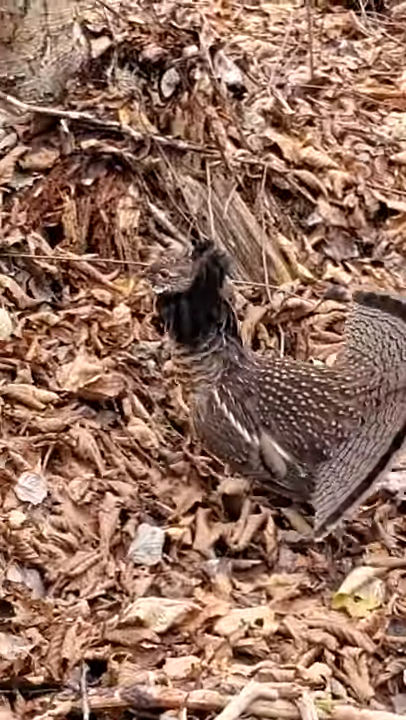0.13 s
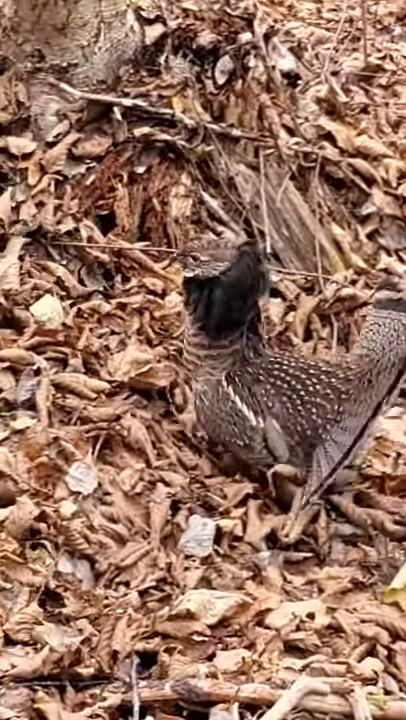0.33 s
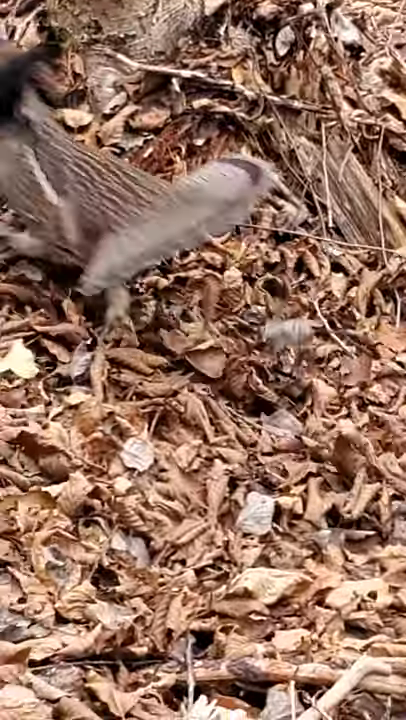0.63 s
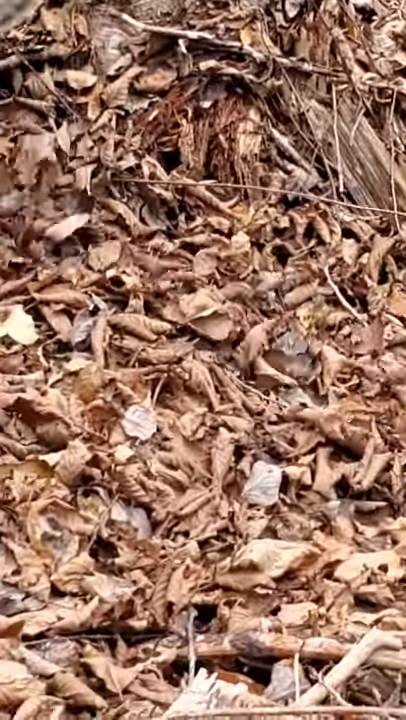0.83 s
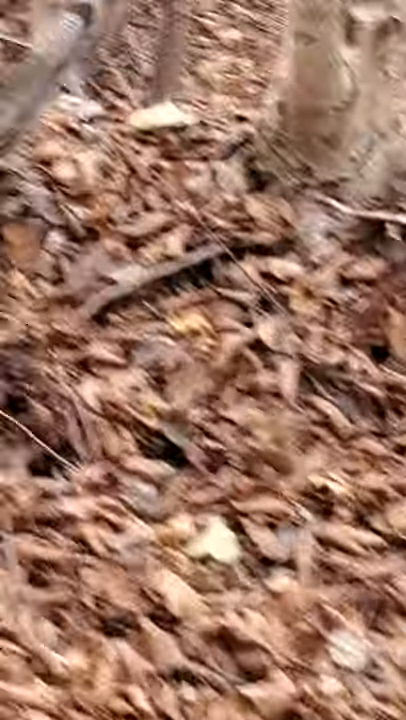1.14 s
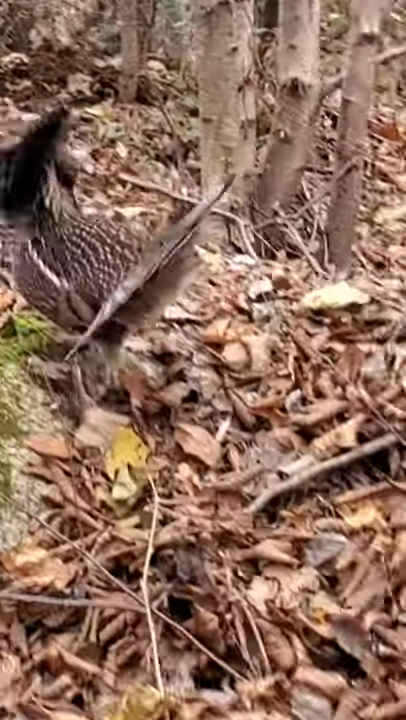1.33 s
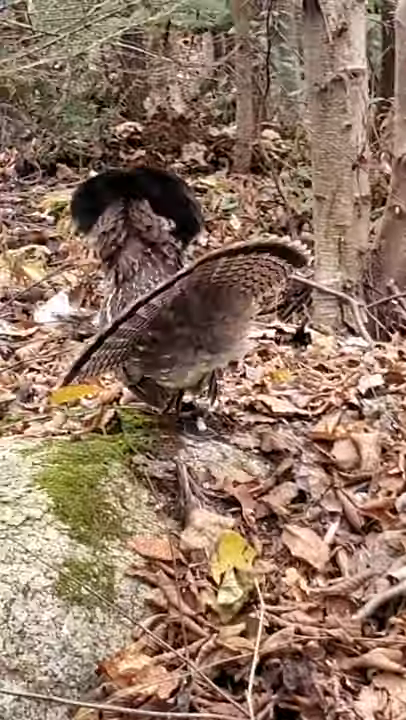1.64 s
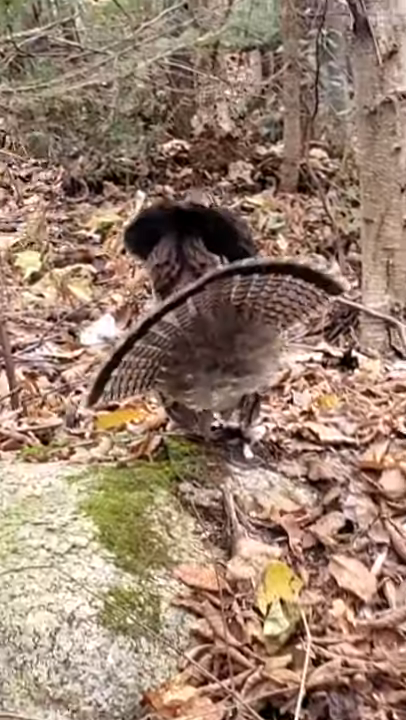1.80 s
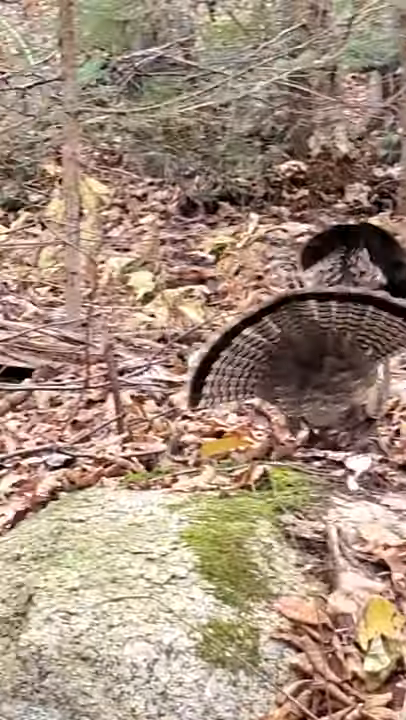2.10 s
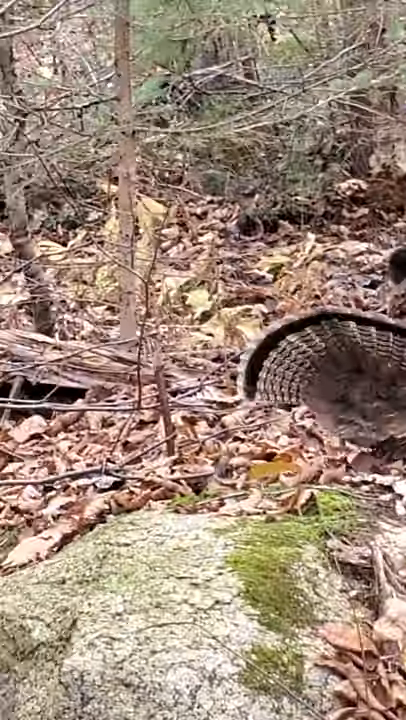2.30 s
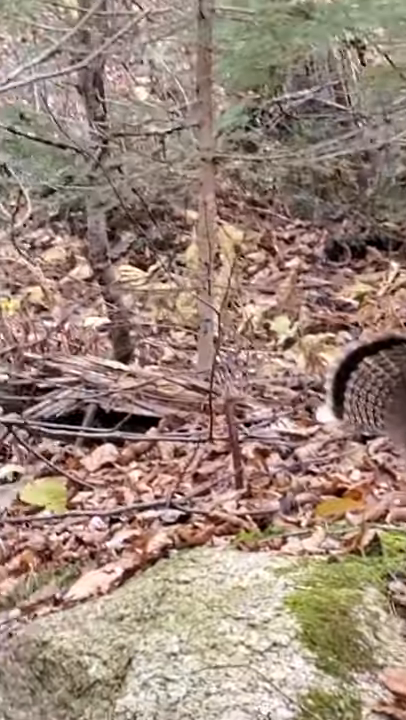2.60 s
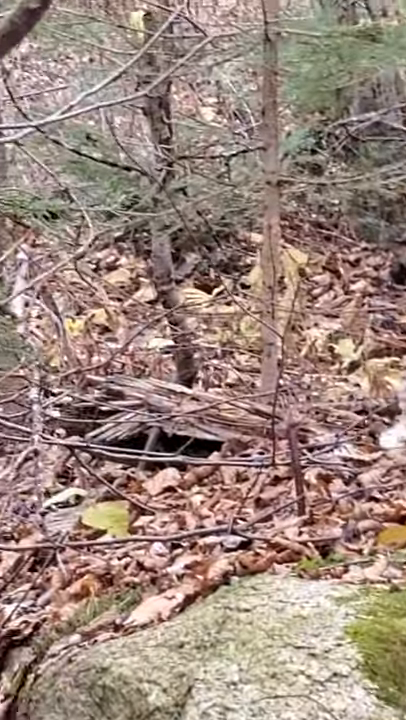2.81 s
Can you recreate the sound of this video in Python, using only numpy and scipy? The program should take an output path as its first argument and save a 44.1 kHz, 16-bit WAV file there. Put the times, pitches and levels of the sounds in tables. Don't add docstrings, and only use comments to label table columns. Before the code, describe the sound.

Dry leaves rustle and tick as a ground bird steps through litter, with light snaps from 0 to 0.5 seconds. A dense, bright burst of crunching and crackling runs from 0.7 to 1.3, then thins to near quiet. A soft low thud at 1.7 precedes a very sharp crack at 1.9. Scattered snaps return, strongest at 2.35-2.6, then fade over faint outdoor air.

```python
import sys
import numpy as np
from scipy import signal
from scipy.fft import rfft, irfft, next_fast_len
from scipy.io import wavfile
from scipy.ndimage import uniform_filter1d, map_coordinates

SR = 44100
rng = np.random.default_rng(int(sys.argv[2]) if len(sys.argv) > 2 else 0)


def wav_out(sig):
    wavfile.write(sys.argv[1], SR, np.round(np.clip(np.atleast_2d(sig).T, -1, 1) * 32767).astype(np.int16))


def nominal_scale(level):
    x = np.asarray(level, float) / 20
    return 10 ** x


N = 130095

# t/s, level/dB, brightness/dB, heap depth/dB, source width/dB
STIR = [(0, -57.5, 1.5, 9, 2), (.2, -56.5, -9.5, 17.5, -3), (.3, -42, -3, 1, -1), (.52, -46.5, -4, -10, 4),
        (.675, -42.5, -3, 1, 3.5), (.76, -31, 4, 1, -2), (.93, -32.5, 1.5, 2, 3),
        (1.07, -43.5, 2, 3.5, 6.5), (1.3, -38.5, 0, -0.5, 2), (1.46, -52.5, 1, 0.5, 5.5),
        (1.82, -57.5, -0.5, 6, 7.5), (1.956, -38.5, 8, 4.5, 4), (2.11, -57.5, -10.5, -6, 13),
        (2.29, -43, 1.5, 1, 5.5), (2.5, -45.5, 2.5, 6, 4), (2.6, -39.5, 3, -1.5, 2),
        (2.78, -51, -1.5, -6.5, 5.5), (2.95, -62, -1.5, -13, 15.5)]
# f/Hz, level/dB
HEAP_COLOUR = [(28, -0.5), (65, -6), (140, -7), (380, -2.5), (900, -6.5), (2100, -16.5)]
# t/s, peak/dB, ring f/Hz, body share/dB, spray after it/dB
SNAPS = [(0.0527, -25, 13300, -37.5, 0), (0.1042, -21.5, 11900, -17, -17),
         (0.2089, -14, 11700, -47, -13), (0.2488, -23, 11800, -27, -1), (0.181, -30, 11000, -3, -22),
         (0.279, -24, 3000, -23, -18), (0.634, -32, 5500, -25, -25),(0.3345, -26, 13200, -27, -3),
         (0.358, -25, 2800, -32, -23), (0.443, -27, 8200, -7, -3.5), (0.6318, -18, 4200, -31, -21),
         (0.7388, -15.5, 12300, -30, -6), (0.7543, -20, 2500, -14, -16), (0.769, -13, 8700, -15, -4),
         (0.8155, -16, 9390, -9, -20), (0.8302, -15, 11900, -2, -7.5), (0.8532, -18, 4240, -17, -5),
         (0.8717, -7.5, 8700, -32, -40.5), (0.9176, -16, 4430, -24, -10.5),
         (0.9604, -10, 9300, -9, -11), (1.0115, -13, 9800, -41, -24), (1.1094, -11, 11000, -0.5, -27),
         (1.1684, -13.5, 14000, -11, -8), (1.2615, -26, 11900, -12, -27), (1.29, -31, 8940, -10, -20),
         (1.4525, -26, 11800, -12, -15), (1.073, -26, 11000, -11, -20), (1.099, -17, 12000, -22, -25),
         (1.302, -14, 11900, -12, -8), (1.5919, -25, 9050, -52, -12),
         (1.8577, -27, 8670, -20, -22), (2.0002, -22, 11500, -23, -25), (2.0282, -24, 11500, -25, -18),
              (2.422, -23, 12000, -30, -20), (1.8758, -16.5, 12100, -5, -23), (1.8916, -15, 9000, -18, -18),
              (1.9056, -24, 11700, -13, -4), (1.9272, -1, 10800, -11, -17.5), (1.9512, -15, 9110, 2.5, -17),
              (2.0546, -33.5, 8800, 0, -6.5), (2.156, -31, 11600, -15, -15), (2.1804, -17, 11100, -10, -14),
              (2.3572, -9, 12800, -40, -25), (2.3765, -24, 2520, -21, -19), (2.393, -22.5, 11500, -12, -3),
              (2.4514, -13.5, 14000, -13, -18), (2.4752, -4.5, 9300, -10, -19),
              (2.489, -9, 14400, -23, -21), (2.5398, -14, 9800, -9, -4), (2.5975, -12, 12200, -37.5, -18),
              (2.6413, -17, 11800, -8, -20), (2.746, -21, 11800, -44, -30), (2.7779, -26, 12400, -19, -13)]
# centre t/s, level/dB, colour f/Hz, length/s
CRUNCHES = [(0.142, -45, 2500, .02), (0.299, -34.5, 4850, 0.034), (.59, -41, 7000, .045),
            (0.625, -33, 5100, .022), (0.736, -33, 9000, .012), (0.771, -26, 4230, 0.044),
            (0.818, -33, 9000, 0.018), (0.831, -27, 9000, .012), (0.854, -23, 4320, .016),
            (.875, -23.5, 9000, .014), (0.931, -37, 4500, 0.029), (0.971, -32, 9000, 0.026),
            (1.183, -33.5, 4970, .025), (1.311, -34, 9000, 0.026), (1.93, -24, 5670, 0.018),
            (2.057, -41.5, 9000, 0.025), (2.178, -38.5, 9000, 0.016), (2.3, -36, 9000, 0.061),
            (2.406, -43, 9000, 0.024), (2.55, -37.5, 4000, 0.018), (2.605, -40, 11100, .03)]
# t/s, peak/dB, pitch f/Hz, length/cycles
THUDS = [(0.203, -30, 89, 1.2), (0.258, -41, 119, 1), (0.837, -36.5, 71.4, 2.2), (1.098, -43, 52.3, 1.1),
         (1.325, -39, 67, 1.3), (1.739, -21, 71.15, 1.13), (2.236, -41, 54, 0.92), (2.545, -33, 78, 2.9),
         (2.608, -35.5, 48.7, 1.84), (0.15, -49, 151, 1.2), (0.69, -53.5, 70, 1.5), (1.265, -45, 70, 1.4),
         (1.67, -45, 70, 1.7), (1.83, -50, 50, 1.5), (2.0, -55, 45.5, 1.5), (2.67, -45, 86, 1.9)]
# t/s, peak/dB, pitch f/Hz, length/cycles
KNOCKS = [(0.136, -30.5, 424, 0.9), (0.296, -38, 553, 3.6), (0.752, -37, 270, 2.9), (0.914, -33, 580, 4.3),
          (1.078, -43, 362, 5.7), (1.382, -28.5, 440, 1.46), (1.623, -55.5, 183, 2.9),
          (1.73, -33, 236, 1.97), (1.851, -55, 233, 3.5), (1.925, -37.5, 190, 3), (2.177, -42, 716, 2.5),
          (2.473, -37.5, 372, 1.9), (2.539, -35, 433, 2.7)]
# f/Hz, likeness/1
LIKENESS = [(60, .9), (300, .96), (1400, .86), (3400, .9), (5600, .84), (7100, .5), (9100, .42),
            (12100, .25), (15100, .1)]
# t/s, treble right over left/dB
FACING = [
    (0, -6.5),
    (.3, 1),
    (.5, -8.5),
    (.66, -7),
    (.8, 3.5),
    (1.2, 0),
    (1.7, 0.5),
    (2.1, -1),
    (2.95, 2),
]
# f/Hz, level/dB
LEFT_COLOUR = [(300, -4.5), (2300, 1), (3600, -2), (5500, -1), (7000, -1), (7600, -10), (11000, -4),
               (15600, -3)]
# f/Hz, level/dB
RIGHT_COLOUR = [(300, -4), (2200, 1.5), (3100, 3), (3900, 1), (5600, -2), (7500, 1.5), (9000, 6),
                (10500, 0.5), (12000, 8), (14000, 1), (15700, 2)]
# f/Hz, extra left lag/rad
TWIST = [(3000, 0.0476), (5000, -0.3), (7300, 0.37), (10000, -1.9), (13000, -2.5)]

GRAINS_PER_S, GRAIN_HZ, GRAIN_OCTAVES, GRAIN_CYCLES, GRAIN_SPREAD_DB = 800, 6460, 0.58, 3.5, 2.3
LEAF_DB, LEAF_LOW_HZ, BRIGHT_HZ = 8, 290, 7400
CLUMP_DB, SHUFFLE_DB, HISS_DB, CRACKLE_DB = 2.2, 1.8, -2, -6
HEAP_DB, HEAP_FOLLOWS_DB_PER_DB, AIR_DB = -49.5, 0.63, -54
SNAP_DB, RING_DB, SHARP_HZ = -0.5, -3.5, 9000
SNAP_S, AFTER_S, SPRAY_RISE_S = .00022, .035, .002
CRUNCH_OCTAVES, CRUNCH_GRIT_DB = .9, 6
PASS_S = .8
FACING_HZ, LAG_S, LOW_CUT_HZ, TOP_HZ = 7000, 20 / 44100, 40, 15800


def unit(x):
    return x / np.sqrt(np.mean(x ** 2) + 1e-20)


def along(points, hz):
    f, v = np.transpose(points)
    return np.interp(np.log(hz + 1), np.log(f + 1), v)


def filtered(x, response):
    m = next_fast_len(N + 8192)
    return irfft(rfft(x, m) * response(np.fft.rfftfreq(m, 1 / SR)), m)[..., :N]


def high_pass(x, hz, order):
    return filtered(x, lambda f: f ** order / (f ** order + hz ** order))


def band_pass(x, order, band_hz):
    return signal.sosfilt(signal.butter(order, band_hz, "band", fs=SR, output="sos"), x)


def stir():
    s, *columns = np.transpose(STIR)
    return [np.interp(np.arange(N) / SR, s, c) for c in columns]


def wobble(rate_hz):
    return map_coordinates(rng.standard_normal(N // 40), [np.arange(N) * rate_hz / SR])


def patchy(depth_db):
    z = signal.stft(rng.standard_normal((2, N)), nperseg=256)[2]
    field = uniform_filter1d(rng.standard_normal(z.shape[1:]), size=10, axis=0)
    field = uniform_filter1d(field, size=5, axis=1)
    return unit(signal.istft(z * nominal_scale(depth_db * unit(field)), nperseg=256)[1][:, :N])


def crackle():
    draw = rng.random((3500, 5))
    gap_s = -np.log(draw[:, 0] + 1e-9) / GRAINS_PER_S
    start = (np.cumsum(gap_s) * SR).astype(int)
    octaves = GRAIN_OCTAVES * 2 * (2 * draw[:, 1] - 1)
    hz = np.clip(GRAIN_HZ * 2 ** octaves, 300, 16000)[:, None]
    t = np.arange(192) / SR
    u = t * hz * np.pi / GRAIN_CYCLES
    size = nominal_scale(-GRAIN_SPREAD_DB * np.log(draw[:, 2:3] + 0.087)) * np.sqrt(hz)
    shape = size * u * np.exp(-u)
    at = np.minimum(start[:, None] + np.arange(192), N).ravel()
    rings = [shape * np.sin(2 * np.pi * (hz * t + draw[:, k:k + 1])) for k in (3, 4)]
    return unit(np.array([np.bincount(at, r.ravel(), N + 1)[:N] for r in rings]))


def leaves():
    level_db, bright_db, heap_db, _ = stir()
    shuffle_db = SHUFFLE_DB * (wobble(27.85) + 0.088 * wobble(150))
    hiss = nominal_scale(HISS_DB) * unit(nominal_scale(shuffle_db + 0.55 * wobble(600)) * patchy(depth_db=2.0))
    grains = nominal_scale(CRACKLE_DB) * unit(nominal_scale(shuffle_db + CLUMP_DB * wobble(70)) * crackle())
    litter = high_pass(hiss + grains, LEAF_LOW_HZ, order=2)
    top = high_pass(litter, BRIGHT_HZ, order=4)
    litter = nominal_scale(-bright_db / 2) * (litter - top) + nominal_scale(bright_db / 2) * top
    rustle = nominal_scale(3.06 * wobble(22.36)) * patchy(depth_db=1.5)
    heap = unit(filtered(rustle, lambda hz: nominal_scale(along(HEAP_COLOUR, hz))))
    heap_gain = nominal_scale(HEAP_DB + heap_db + HEAP_FOLLOWS_DB_PER_DB * (level_db - level_db.mean()))
    return nominal_scale(level_db + LEAF_DB) * litter + heap_gain * heap


def air():
    return nominal_scale(AIR_DB) * patchy(depth_db=-7.5)


def snaps():
    out, t = np.zeros((2, N + SR)), np.arange(SR // 8) / SR
    crack = (t / SNAP_S) ** 2 * np.exp(-t / SNAP_S)
    for s, peak_db, hz, body_db, after_db in SNAPS:
        noise = rng.standard_normal((3, 2, len(t)))
        body = nominal_scale(body_db + 3.0) * unit(band_pass(noise[0], 2, [1500, 6000]))
        ring = nominal_scale(RING_DB) * unit(band_pass(noise[1], 1, [hz * 0.95, min(hz * 1.3, 17000)]))
        sharp = min(hz / SHARP_HZ, 1) ** 2 * np.diff(noise[2], prepend=0) / 2
        sound = sharp + ring + body
        spray = nominal_scale(after_db - 60 * t / AFTER_S) * (1 - np.exp(-t / SPRAY_RISE_S))
        fade = crack / np.abs(crack * sound[0]).max() + spray
        out[:, round(s * SR):][:, :len(t)] += nominal_scale(peak_db + SNAP_DB) * sound * fade
    return out[:, :N]


def crunches():
    out = np.zeros((2, N + SR))
    f = np.fft.rfftfreq(SR // 5, 1 / SR) + 1
    for s, level_db, hz, length_s in CRUNCHES:
        u = np.linspace(-1.5, 1.5, round(3 * length_s * SR))
        noise = rng.standard_normal((3, SR // 5))
        grit = nominal_scale(CRUNCH_GRIT_DB * unit(uniform_filter1d(noise[2], size=40)))
        colour = np.exp(-(np.log2(f / hz) / CRUNCH_OCTAVES) ** 2)
        burst = unit(irfft(rfft(noise[:2] * grit) * colour))
        swell = nominal_scale(level_db) * np.exp(-4 * u ** 2)
        out[:, round((s - 1.5 * length_s) * SR):][:, :len(u)] += swell * burst[:, :len(u)]
    return out[:, :N]


def contacts(rows, lift_db, overtone_db, sag_cycles):
    out, t = np.zeros(N + SR), np.arange(SR // 6) / SR
    for s, peak_db, hz, cycles in rows:
        u = t * hz / cycles * np.e
        turns = hz * t + sag_cycles * (1 - np.exp(-hz * t))
        overtone = nominal_scale(overtone_db) * np.exp(-u / 2) * np.sin(2 * np.pi * 2.41 * turns)
        swing = np.sin(2 * np.pi * turns) + overtone
        out[round(s * SR):][:len(t)] += nominal_scale(peak_db + lift_db) * u * np.exp(1 - u) * swing
    return out[:N]


def knocks():
    return contacts(KNOCKS, lift_db=3.5, overtone_db=-0.5, sag_cycles=0.21)


def thuds():
    return contacts(THUDS, lift_db=-2.0, overtone_db=-6.5, sag_cycles=0.046)


def at_ports(field):
    def split(hz):
        turn = np.arccos(np.clip(along(LIKENESS, hz), -1, 1)) / 2
        return np.array([np.cos(turn), np.sin(turn)])
    common, apart = filtered(field, split)
    pair = np.array([common + apart, common - apart])
    treble = high_pass(pair, FACING_HZ, order=4)
    facing_db = np.interp(np.arange(N) / SR, *np.transpose(FACING))
    return pair + treble * (nominal_scale(np.array([-facing_db, facing_db]) / 2) - 1)


def scene():
    field = leaves() + snaps() + crunches() + air()
    pass_db = np.interp(np.arange(N) / SR, [PASS_S - .1, PASS_S + .1], [4, -4])
    field[1] *= nominal_scale(stir()[3] + pass_db)
    field[0] += knocks() + thuds()
    return at_ports(field)


def top_cut(x):
    return signal.sosfilt(signal.butter(12, 16830, fs=SR, output="sos"), x)


def record(dry):
    def ports(hz):
        lag = np.exp(-1j * (2 * np.pi * hz * LAG_S + along(TWIST, hz)))
        band = (hz < TOP_HZ) * hz ** 3 / (hz ** 3 + LOW_CUT_HZ ** 3)
        return np.array([nominal_scale(along(LEFT_COLOUR, hz)) * lag, nominal_scale(along(RIGHT_COLOUR, hz))]) * band
    mix = np.clip(filtered(dry, ports), -1, 1)
    return top_cut(mix)


dry = scene()
out = record(dry)
wav_out(out)
```